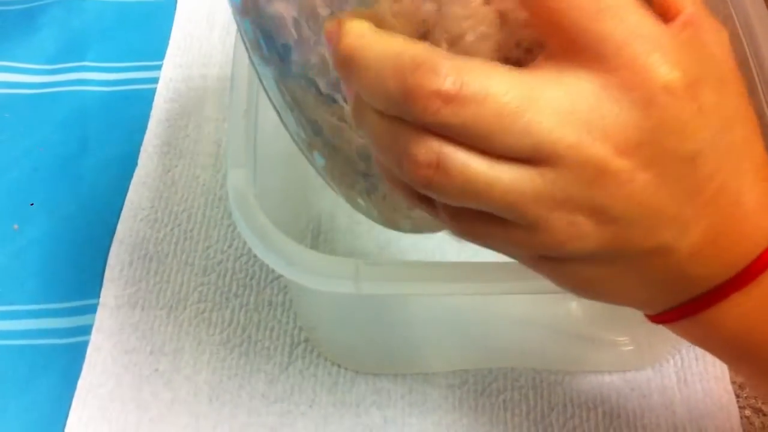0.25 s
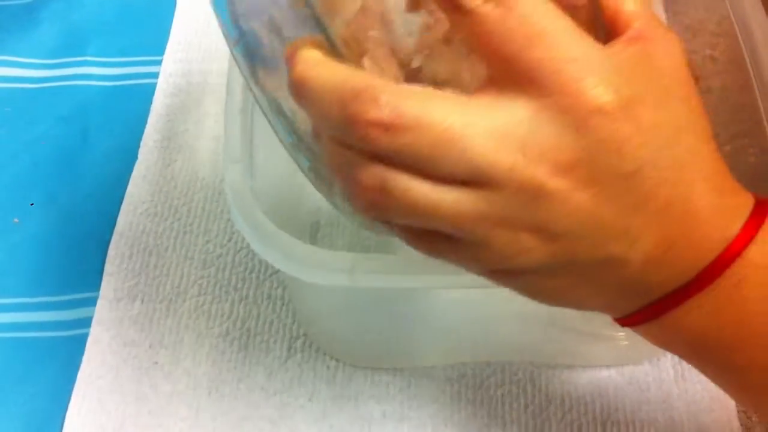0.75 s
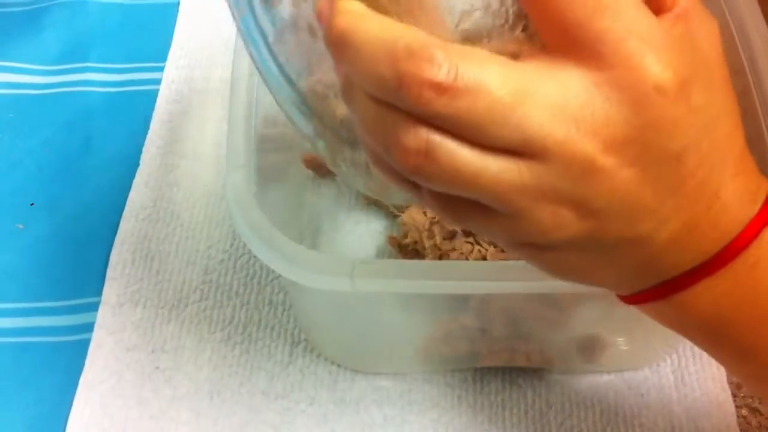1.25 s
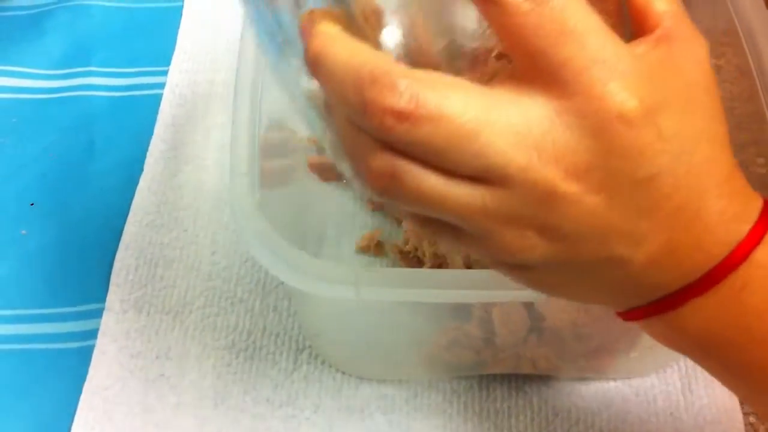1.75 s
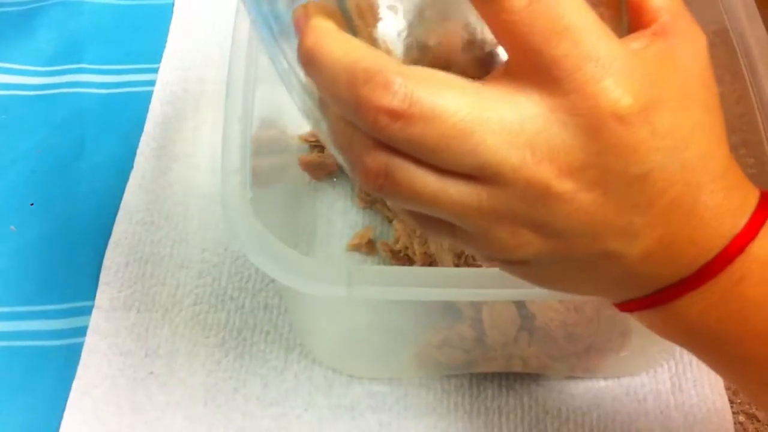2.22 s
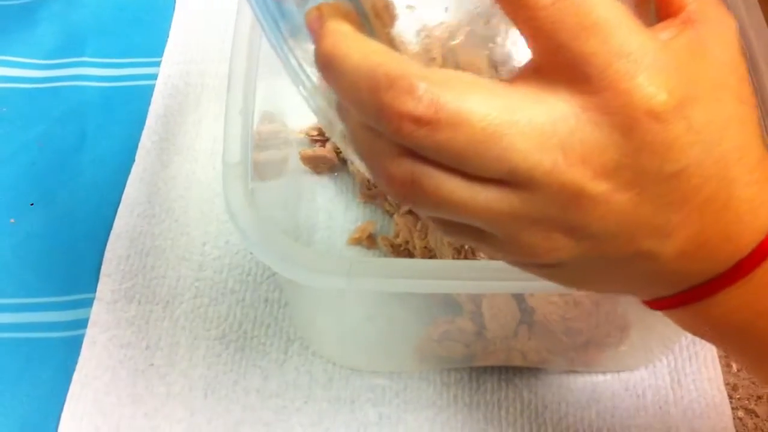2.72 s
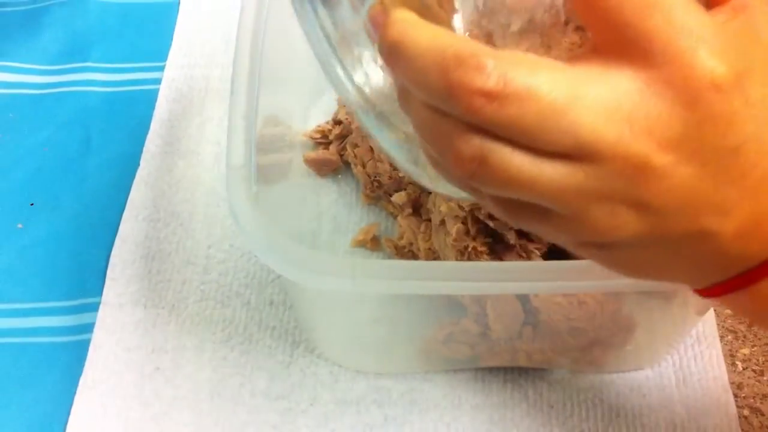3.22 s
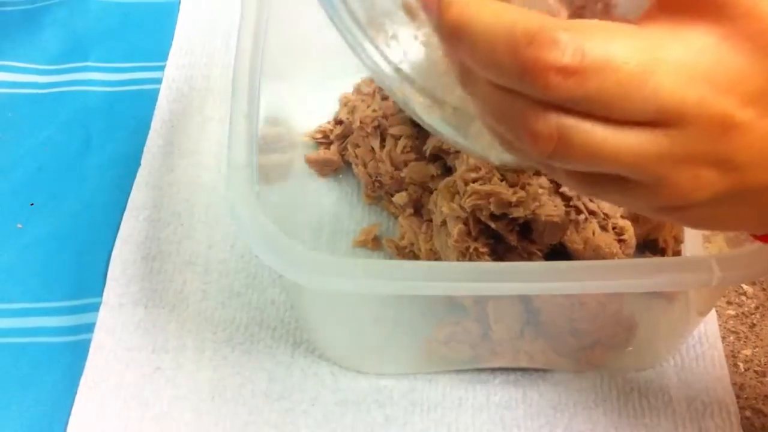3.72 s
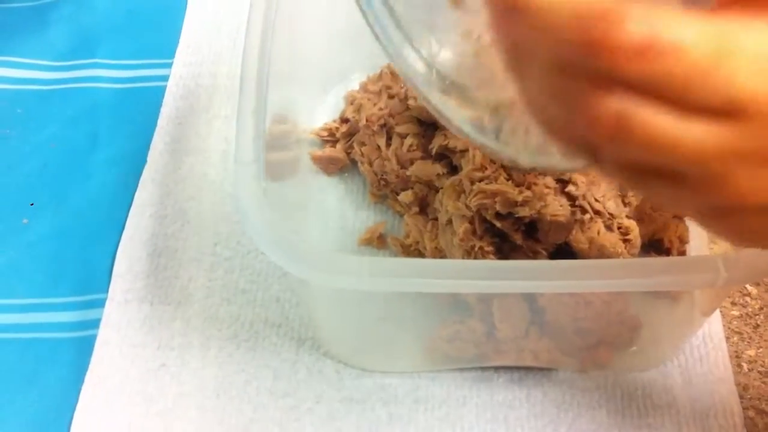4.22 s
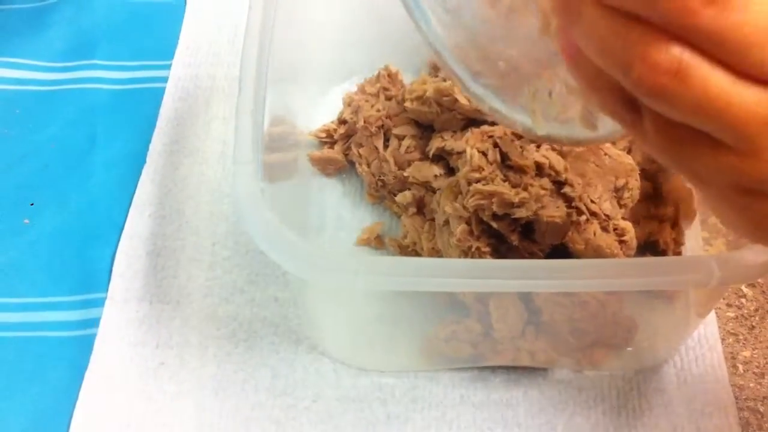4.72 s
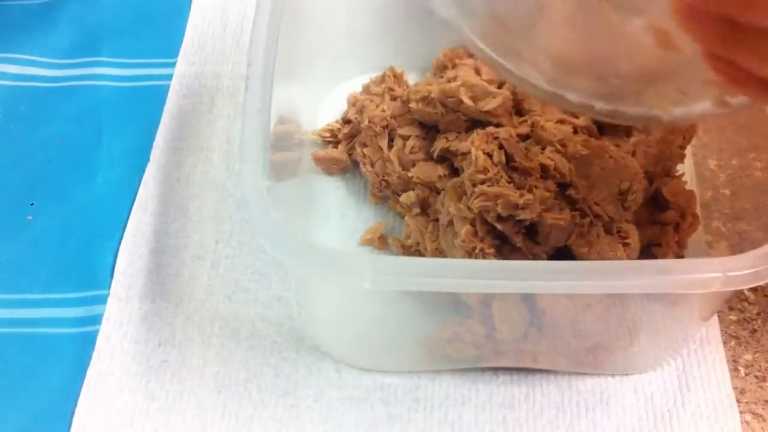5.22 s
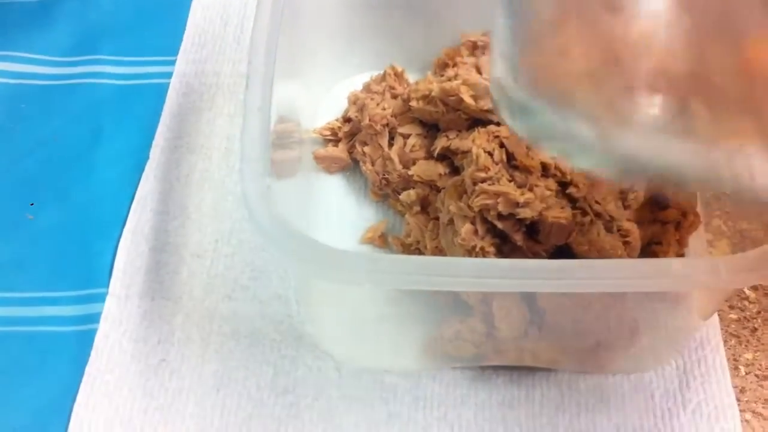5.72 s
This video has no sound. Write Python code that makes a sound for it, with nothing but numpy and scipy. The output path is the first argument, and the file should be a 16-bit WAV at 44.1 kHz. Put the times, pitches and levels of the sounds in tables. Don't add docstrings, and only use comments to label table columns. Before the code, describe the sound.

A small kitchen heard close up, with steady soft air and a low appliance hum. Two faint distant rasps at 0.3 and 0.55 s lead to dull plastic box bumps at 0.67, 0.76 and 0.94 s. A sharp, quickly damped glass clink lands at 1.05 s with a soft scuff just before it. From 1.3 to 2.2 s there are tiny wet food ticks and a soft nudge at 1.8. Bright rim knocks follow at 2.3 and, softer, 2.7, then a higher, glassier base hit at 3.05. A glancing, duller blow at 3.5 runs into a short scrape. Another piercing base hit comes at 4.0, then a hard rim knock at 4.3 with taps and drags after it. The last three knocks, at 4.8, 5.15 and 5.5 s, are loudest and ring more loosely, each leaving a short bright room tail; a last light scrape and tap follow.

```python
import sys
import numpy as np
from scipy import signal
from scipy.fft import rfft, irfft, next_fast_len
from scipy.io import wavfile
from scipy.ndimage import uniform_filter1d

SR = 44100
rng = np.random.default_rng(int(sys.argv[2]) if len(sys.argv) > 2 else 0)


def field_ratio(decibels):
    return 10 ** (np.asarray(decibels, dtype=float) / 20)


def transcribe(u):
    v = np.clip(np.atleast_2d(u).T, -1, 1)
    q = np.round(v * 32767).astype(np.int16)
    wavfile.write(sys.argv[1], SR, q)


N = 262836


def shape(x, points):
    hz, db = np.transpose(points)
    size = next_fast_len(len(x))
    f = np.arange(size // 2 + 1) * SR / size + 1
    gain = field_ratio(np.interp(np.log(f), np.log(hz), db))
    return irfft(rfft(x, size) * gain, size)[:len(x)]


def unit(x):
    return x / np.sqrt(np.mean(x ** 2))


def band(x, hz, width_hz):
    return signal.lfilter(*signal.iirpeak(hz, hz / width_hz, fs=SR), x)


def highpass(x, hz):
    return signal.sosfilt(signal.butter(4, hz, "high", fs=SR, output="sos"), x)


def ring(x, modes):
    out = 0
    for hz, db, t60 in modes:
        pole = np.exp((2j * np.pi * hz - np.log(1000) / t60) / SR)
        out = out + field_ratio(db) * signal.lfilter([1], [1, -pole], x).imag
    return out


def blows(s, db):
    x = np.zeros(N)
    sign = np.sign(rng.standard_normal(len(s)))
    x[(np.asarray(s) * SR).astype(int)] = field_ratio(db) * sign
    return x


def burst(s, db, t60, points):
    fade = signal.lfilter([1], [1, -np.exp(-np.log(1000) / (t60 * SR))], np.abs(blows(s, db)))
    return fade * unit(shape(rng.standard_normal(N), points))


def stroke(start, length, attack_db_s, release_db_s, swell_db):
    t = np.arange(N) / SR - start
    swell = swell_db * (np.clip(t / length, 0, 1) - 1)
    return swell + attack_db_s * np.minimum(t, 0) - release_db_s * np.maximum(t - length, 0)


# frequency in Hz, level in dB per Hz.
AIR_COLOUR = [(25, -48.5), (90, -39), (150, -11.5), (259, -5.5), (706, -10.5), (1980, -16), (2600, -23),
              (15500, -33.5)]
# frequency in Hz, width in Hz, level in dB.
HUM = [(118, 2, -66.5), (159.1, 7, -57.5), (267.2, 29, -59.5), (475.5, 25, -59.5), (666, 120, -61.5),
       (1963, 0.83, -70)]
GAIN_STEP_DB, GAIN_BACK_S = -3, 2.2


def kitchen():
    air = field_ratio(-56.5) * unit(shape(rng.standard_normal(N), AIR_COLOUR))
    hum = sum(field_ratio(db) * unit(band(rng.standard_normal(N), hz, width)) for hz, width, db in HUM)
    s, _, rim_db = np.transpose(KNOCKS)[:3]
    push = signal.lfilter([1], [1, -np.exp(-1 / (GAIN_BACK_S * SR))], np.abs(blows(s, rim_db)))
    return (air + hum) * field_ratio(GAIN_STEP_DB * uniform_filter1d(push, size=8192))


def jolt():
    s, crack_db = np.transpose(KNOCKS)[:2]
    return ring(blows(s, crack_db), [(45, -60.5, .12)])


# start in seconds, level in dB, fade in dB per second, upper band over lower in dB.
RASPS = [
    (.308, -53, 95, -8),
    (0.555, -61, 56, -6.5),
]
RASP_HOLD_S, RASP_ATTACK_DB_S, RASP_DB = 0.0096, 1102, 1.5


def rasp():
    noise = rng.standard_normal((2, N))
    low = unit(band(noise[0], 3700, 100))
    low = low + 0.62 * unit(band(band(noise[0], 3300, 600), 3300, 600))
    high = unit(band(band(noise[1], 5700, 1100), 4400, 1600))
    out = np.zeros(N)
    for s, db, fade_db_s, high_db in RASPS:
        envelope = field_ratio(db + RASP_DB + stroke(s, RASP_HOLD_S, RASP_ATTACK_DB_S, fade_db_s, 0))
        out += envelope * (low + field_ratio(high_db) * high)
    return out


# start in seconds, peak in dB, centre in Hz.
TICKS = [(0.7376, -47, 3050), (1.283, -42.5, 6240), (1.3994, -47, 3620), (1.4511, -45, 3650),
         (1.4724, -44, 4080), (1.4942, -40, 2590), (1.5286, -43, 3700), (1.5704, -46, 3680),
         (1.6227, -44, 6200), (1.6644, -57, 3730), (1.6945, -42.5, 3950), (1.956, -40, 6400),
         (2.0064, -46, 3520), (2.0363, -46, 3550), (2.106, -47, 6200), (2.1654, -51, 5770)]


def food():
    out, t = np.zeros(N), np.arange(256) / SR
    for s, db, hz in TICKS:
        start = int(s * SR)
        out[start:start + len(t)] += field_ratio(db - 3.0) * np.exp(-t / .0008) * np.sin(2 * np.pi * hz * t)
    return out


# start in seconds, middle peak in dB, low level in dB, treble level in dB.
THUDS = [
    (0.67, -43, -42, -46.5),
    (0.762, -24, -20, -33),
    (0.834, -57, -91, -48.5),
    (0.944, -27, -23.5, -50),
    (1.788, -43, -70, -62),
]
# frequency in Hz, level in dB, t60 in seconds.
BOX_LOW = [(153, -7.5, .08), (246, -7, 0.035), (330, -12.5, 0.1)]
BOX_MID = [(690, 0, .045), (560, -4, .04), (880, -2.5, .04), (1250, -10, .02)]


def box():
    s, mid_db, low_db, top_db = np.transpose(THUDS)
    click = burst(s, top_db - 1.0, 0.071, [(900, 2), (2000, 12.5), (4400, -4.5), (7000, -5), (15000, -52)])
    push = burst(s, mid_db - 29.5, 0.044, [(300, 3.5), (3000, 1.2)])
    return highpass(ring(blows(s, low_db - 3), BOX_LOW) + ring(push, BOX_MID) + click, 130)


# start in seconds, level in dB.
SCUFFS = [(1.019, -34.5), (1.028, -35)]


def scuff():
    s, db = np.transpose(SCUFFS)
    return burst(s, db, .02, [(700, -3.5), (1400, 5), (2600, -4.0), (5000, -32)])


def tock():
    return burst([3.52], [-30], 0.086, [(350, -11), (600, -2), (1100, 2.5), (1800, -15.5), (3000, -34.5)])


# start in seconds, length in seconds, rim in dB, base in dB, swell in dB from start to end.
SCRAPES = [(3.06, .02, -65, -50, -5), (3.1, 0.023, -63, -31, -2.3), (3.499, 0.02, -34, -83, -5.5),
           (3.56, 0.092, -22, -38.5, 12.5), (3.694, 0.067, -52.5, -66, -5), (4.055, 0.053, -53, -45, 13),
           (4.076, 0.058, -45.5, -26.5, -1), (4.404, 0.021, -30, -32, -9.5),
           (4.557, 0.063, -30, -35.5, 27.5), (5.522, 0.09, -34, -41, 1)]
# start in seconds, length in seconds, level in dB.
WIPES = [(3.527, 0.034, -46.5), (3.72, 0.036, -56.5), (4.13, 0.02, -66), (5.587, .02, -45)]
# frequency in Hz, level in dB, t60 in seconds.
SCRAPE_RIM_MODES = [(2540, 4, 0.017), (2250, 1, 0.015), (2100, -2.5, 0.06), (1870, -5, 0.033),
                    (1115, -12.5, .05)]
SCRAPE_BASE_MODES = [(4210, 0, .06), (3550, -4, .014), (3900, -3, .012), (4650, -3, .012), (7190, -7, .06),
                     (9620, -14, .05), (1900, -8, .03)]
SCRAPE_ATTACK_DB_S, SCRAPE_RELEASE_DB_S = 1505.5, 548


def drag(start, length, swell_db):
    return stroke(start, length, SCRAPE_ATTACK_DB_S, SCRAPE_RELEASE_DB_S, swell_db)


def slip_noise():
    size = field_ratio(2.5 * rng.exponential(size=N))
    return unit(rng.standard_normal(N) * size * (rng.random(N) < .15))


def damped_wall(x, modes):
    return sum((-1) ** k * band(ring(x, [m]), m[0], m[0] / 6) for k, m in enumerate(modes))


def scrapes():
    drags = field_ratio([drag(s, length, swell_db) for s, length, _, _, swell_db in SCRAPES])
    rim, base = field_ratio(np.transpose(SCRAPES)[2:4]) @ drags
    out = np.zeros(N)
    for pressure, modes in ((rim, SCRAPE_RIM_MODES), (base, SCRAPE_BASE_MODES)):
        slips = slip_noise()
        out += field_ratio(-8.5) * damped_wall(pressure * slips, modes) / np.std(damped_wall(slips, modes))
    wipe = field_ratio(-18) * base + sum(field_ratio(db + drag(s, length, 0)) for s, length, db in WIPES)
    hiss_colour = [(500, -26), (1200, 5.0), (3000, -5.5), (5500, 3.5), (9000, -12), (15500, -17.0)]
    return out + wipe * unit(shape(slip_noise(), hiss_colour))


# start in seconds, crack peak in dB, rim in dB, base in dB.
TAPS = [(1.504, -52, -42.5, -66), (2.3809, -29, -30, -35.5), (2.4, -46, -33.5, -42),
        (2.8042, -64.5, -34, -41.5), (2.843, -49, -39.5, -52), (4.3944, -20.5, -33, -29.5),
        (4.4162, -17.5, -40.5, -26), (4.583, -40, -45, -56), (4.598, -39, -48, -52),
        (4.62, -26.5, -27.5, -38), (5.5706, -52, -33.5, -53), (5.592, -28, -31, -33)]
# frequency in Hz, level in dB, t60 in seconds.
TAP_MODES = [
    [(2418, -4, 0.014), (2037, -9, 0.039), (1830, -16, 0.022), (1149, -25, 0.092)],
    [(4070, -9, 0.022), (3520, -3, 0.023), (4364, -19, 0.013)],
    [(6300, -1, 0.019), (6660, -12.5, 0.029)],
]
TAP_S, TAP_HIGH_DB = 0.006, -10.5


def taps():
    out, t = np.zeros(N), np.arange(SR // 10) / SR
    for s, crack_db, rim_db, base_db in TAPS:
        start = int(s * SR)
        high_db = (crack_db + rim_db) / 2 + TAP_HIGH_DB
        for db, modes in zip((rim_db, base_db, high_db), TAP_MODES):
            for hz, mode_db, t60 in modes:
                chance = rng.standard_normal(3)
                hold = np.clip(t / .0015, 0, 1) * field_ratio(-60 * np.clip(t - TAP_S, 0, None) / t60)
                tone = np.sin(2 * np.pi * hz * (1 + .012 * chance[0]) * t + 3 * chance[1])
                out[start:start + len(t)] += field_ratio(db + mode_db + 6.5 * chance[2]) * hold * tone
    s, crack_db = np.transpose(TAPS)[:2]
    crack_colour = [(1500, 1.5), (4000, 6.0), (9000, 1), (13000, -1.0), (16000, -17.5)]
    return out + burst(s, crack_db - 4, .014, crack_colour)


# start in seconds, crack peak in dB, rim in dB, base in dB, looseness of the grip from -1 to 1.
KNOCKS = [
    (1.051, -6, -14.5, -40, -0.52),
    (2.297, -1, -17, -47, -0.33),
    (2.705, -12, -9.5, -33, 0.22),
    (3.047, -2, -41, -11.5, -0.62),
    (3.52, -10, -24.5, -27, -0.75),
    (4.018, -2.5, -41.5, -8.5, -0.55),
    (4.326, 0, -9, -40, -0.49),
    (4.814, 3.1, -5.5, -25.5, 0.56),
    (5.155, 2, -5, -29, 0.72),
    (5.475, 0, -6, -48.5, 0.97),
]
# frequency in Hz, level in dB.
CRACK = [(400, -24.5), (900, -11), (1900, 0), (3200, -2.5), (5200, 2.5), (8000, -3), (11500, -8),
         (13500, -41)]
RATTLE = [(700, -11.5), (1800, 0.5), (2600, -4), (4300, 4), (6500, -1.5), (9000, -7.5), (12000, -13),
          (13500, -39.5)]
RIM_HZ = [1145, 2445, 4120, 6255]
BASE_HZ = [15330, 7190, 8735, 9625, 10750]
WALL_HZ = [900, 1860, 3740, 4195, 4615]
RIM_T60_S = [0.059, 0.076, 0.085, 0.056]
BASE_T60_S = [.025, .04, .035, .035, .03]
WALL_T60_S = [0.0065, 0.017, 0.03, 0.04, 0.033]
# pitch ratio, level in dB, ring-time ratio.
RIM_PARTNERS = [(0.962, -9, 0.28), (.975, -5, 0.7), (.98, -12, .7), (1.02, -19, 0.17)]
BASE_PARTNERS = [(.94, -3, .6), (.985, -9, .8), (.92, -10, .7), (.978, -8, .8), (1.095, -.1, 1.1)]
WALL_PARTNERS = [(0.801, -24, 0.57), (0.819, -12.5, 3.3), (.92, -8, 1.4), (1.03, -28, .6), (1.21, 2, 1.2)]
RIM_ECHO_DB = [-13.5, -23.5, -27, -18.5]
BASE_ECHO_DB = [-34, -17.5, -21.5, -21, -26.5]
WALL_ECHO_DB = [-29.5, -27.5, -20, -24, -20]
DRIVER = [1, 1, 1, 1, 0, 2, 1, 0, 0, 2, 0, 0, 2, 1]
# level in dB over its driver, dB gained as the grip loosens.
STRIKE = [(-12, -14), (0.4, -6.9), (-6.5, 2.5), (-4.5, 3.5), (-31.5, -13), (-1.2, 2.2), (-19, 5),
          (-23.5, -10), (-25, -2.5), (-10, -17), (-18, -2), (-19, 0.5), (6.2, 9.5), (-18.5, 1)]
GRIP_RING = 0.1
FULL_SAG, EMPTYING_S, EMPTY_PITCH = .043, 0.83, 1.002
ECHO_T60_S, ECHO_TOP_T60_S, ECHO_FLUTTER_S = 0.29, 0.25, .004
ATTACK_S = 0.0004


def wander(t, count):
    span = int(ECHO_FLUTTER_S * SR)
    steps = rng.standard_normal((len(t) // span + 1, count))
    return uniform_filter1d(np.repeat(steps, span, axis=0)[:len(t)], span, axis=0)


def knocks():
    s, crack_db, rim_db, base_db, loose = np.transpose(KNOCKS)
    over_db, loose_db = np.transpose(STRIKE)
    levels = np.array([crack_db, rim_db, base_db])[DRIVER].T + over_db + np.outer(loose, loose_db)
    pitches = EMPTY_PITCH - FULL_SAG * np.exp(-(s - s[0]) / EMPTYING_S)
    grips = np.exp(GRIP_RING * loose) * 1.01
    free_hz = np.array(RIM_HZ + BASE_HZ + WALL_HZ)
    free_t60 = np.array(RIM_T60_S + BASE_T60_S + WALL_T60_S)
    ratio, partner_db, shorter = np.transpose(RIM_PARTNERS + BASE_PARTNERS + WALL_PARTNERS)
    echo_db = np.array(RIM_ECHO_DB + BASE_ECHO_DB + WALL_ECHO_DB)
    echo_t60 = np.interp(free_hz, [3000, 9000], [ECHO_T60_S, ECHO_TOP_T60_S])
    out, t = np.zeros(N + SR), np.arange(SR // 2)[:, None] / SR
    for s_hit, db, pitch, grip in zip(s, levels, pitches, grips):
        chance = rng.standard_normal((3, len(free_hz)))
        hz = free_hz * pitch ** (free_hz[0] / free_hz)
        turn, t60 = 2 * np.pi * hz * t, free_t60 * grip
        main = field_ratio(db - 60 * t / t60) * np.sin(turn)
        partner = field_ratio(db + partner_db + 1.5 * chance[0] - 60 * t / (t60 * shorter))
        partner *= np.sin(ratio * (1 + .006 * chance[2]) * turn)
        echo = wander(t, len(hz)) * np.sin(turn) + wander(t, len(hz)) * np.cos(turn)
        echo *= field_ratio(db + echo_db - 60 * t / echo_t60) * np.clip(t / .015, 0, 1)
        modes = np.clip(t / ATTACK_S, 0, 1) * (main + partner) + echo
        start = int(s_hit * SR)
        out[start:start + len(t)] += modes @ np.sign(chance[1])
    top_db = levels[:, len(RIM_HZ)]
    top = burst(s, top_db - 8.5, .035, [(9000, -40.5), (12500, 4), (15300, 2), (16000, -24)])
    crack = burst(s, crack_db - 22, .028, CRACK)
    rattle = burst(s, crack_db - 26.5, .13, RATTLE)
    return out[:N] + top + crack + rattle


ROOM_DB, ROOM_T60_S, ROOM_TOP_T60_S = -23, 0.41, 0.6
EARLY_DB, EARLY_T60_S = -11, .05


def room(x):
    t = np.arange(SR // 2) / SR
    noise = rng.standard_normal((3, len(t)))

    def fade(t60):
        return field_ratio(-60 * t / t60) * np.sqrt(2 * np.log(1000) / (t60 * SR))

    low = shape(noise[0], [(3000, 7), (9000, -5)]) * fade(ROOM_T60_S)
    tail = field_ratio(ROOM_DB) * (low + noise[1] * fade(ROOM_TOP_T60_S)) * np.clip(t / 0.004, 0, 1)
    early = field_ratio(EARLY_DB) * noise[2] * fade(EARLY_T60_S)
    return x + signal.fftconvolve(x, tail + early)[:N]


def scene():
    glass = highpass(knocks() + taps() + scrapes(), 710)
    glass = shape(glass, [(15500, 0), (16100, -18)])
    table = room(glass + tock() + box() + scuff() + food())
    return (table + rasp() + kitchen() + jolt())[None]


def top_cut(x):
    return signal.sosfilt(signal.butter(12, 16820, fs=SR, output="sos"), x)


def record(dry):
    keep, lead_in = np.ones(N), np.zeros(N)
    bass = signal.sosfiltfilt(signal.butter(6, 1500, fs=SR, output="sos"), dry)
    treble = dry - bass
    for s, peak_db in np.array(KNOCKS)[:, :2]:
        end = int((s - .004) * SR)
        start = (end - 542) // 1024 * 1024 + 542
        keep[start:end] = np.std(treble[0, start:end + 1]) > field_ratio(-50)
        lead_in[end:int(s * SR)] = field_ratio(peak_db - 37)
    gated = bass + treble * uniform_filter1d(keep, size=64)
    gated = gated + lead_in * highpass(rng.standard_normal(N), 1200)
    over = gated - gated / (1 + (np.abs(gated) / .76) ** 8) ** (1 / 8)
    limited = gated - over + uniform_filter1d(over, size=48)
    limited = signal.sosfilt(signal.ellip(8, .2, 80, 16500, fs=SR, output="sos"), limited)
    return top_cut(limited)


dry = scene()
out = record(dry)
transcribe(out)
```